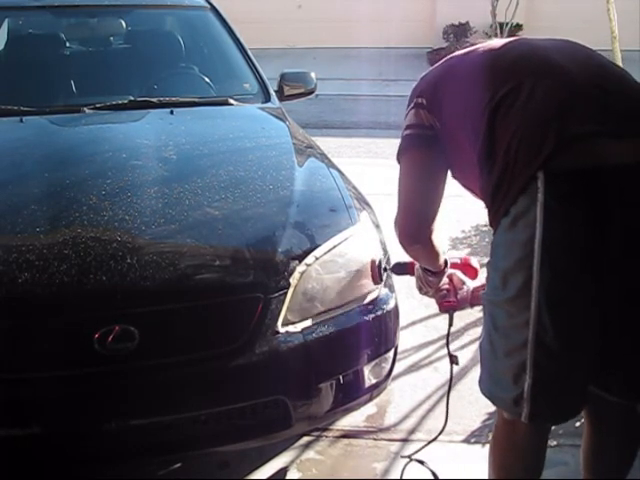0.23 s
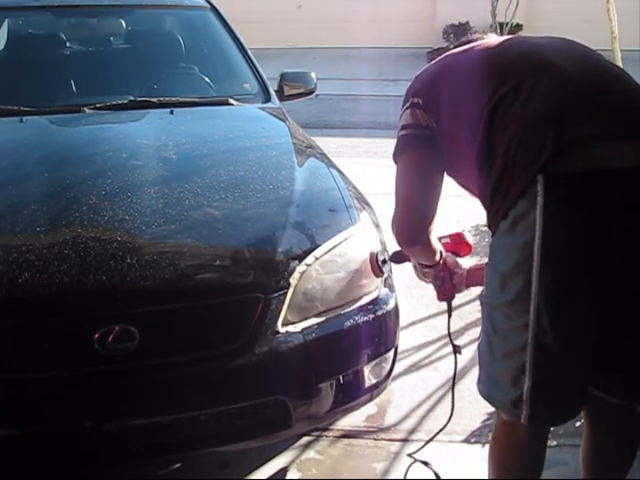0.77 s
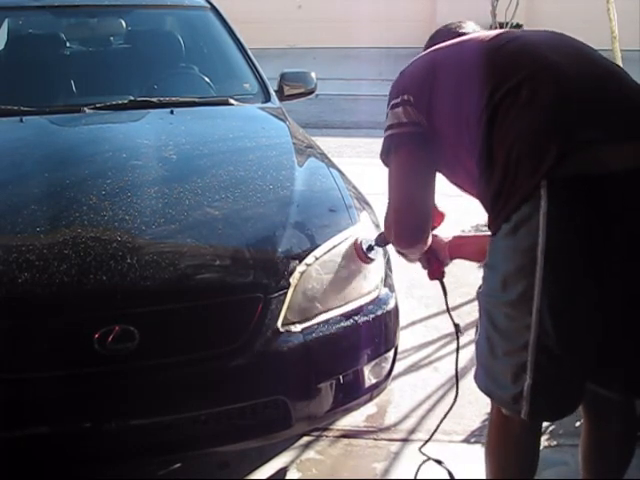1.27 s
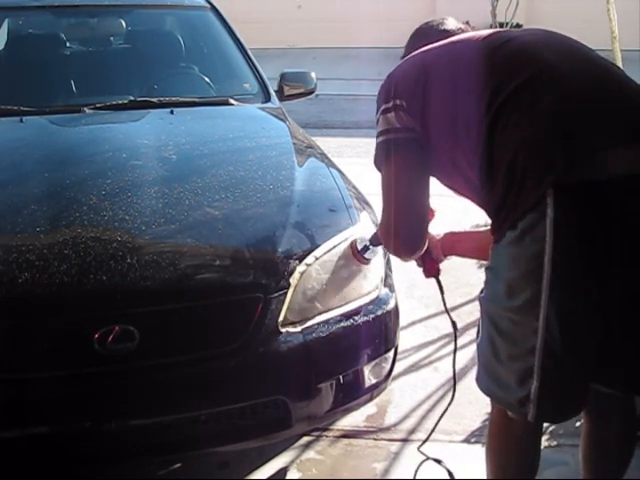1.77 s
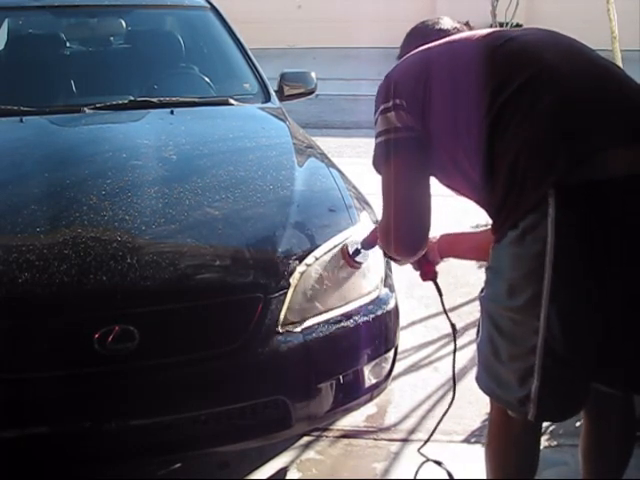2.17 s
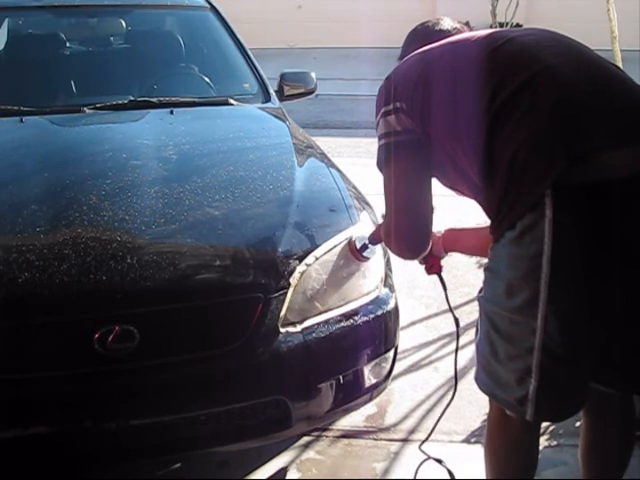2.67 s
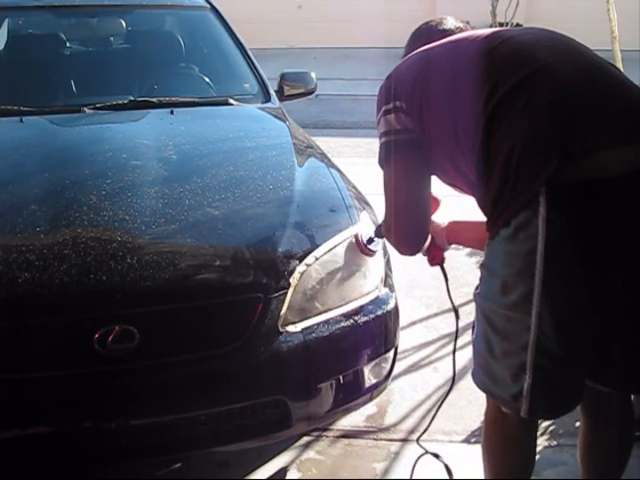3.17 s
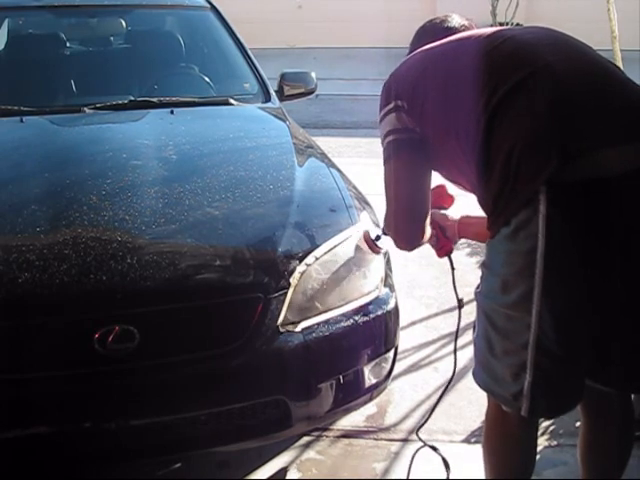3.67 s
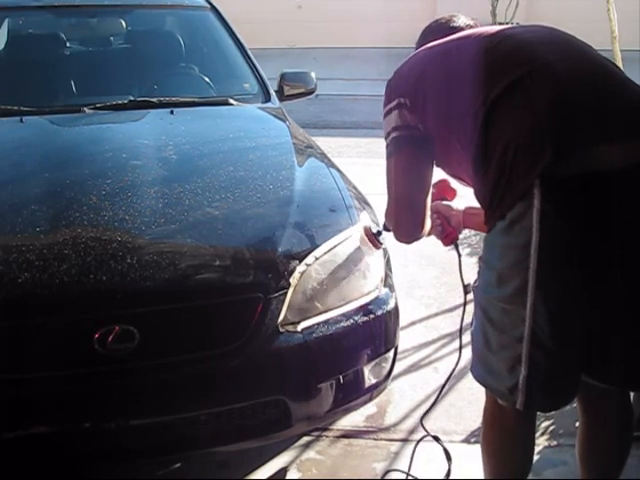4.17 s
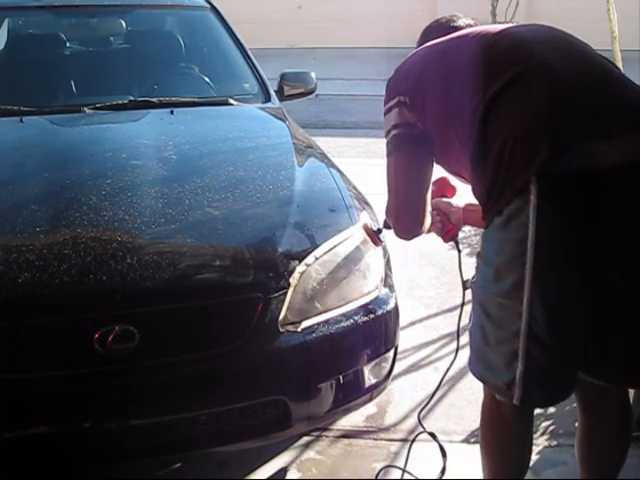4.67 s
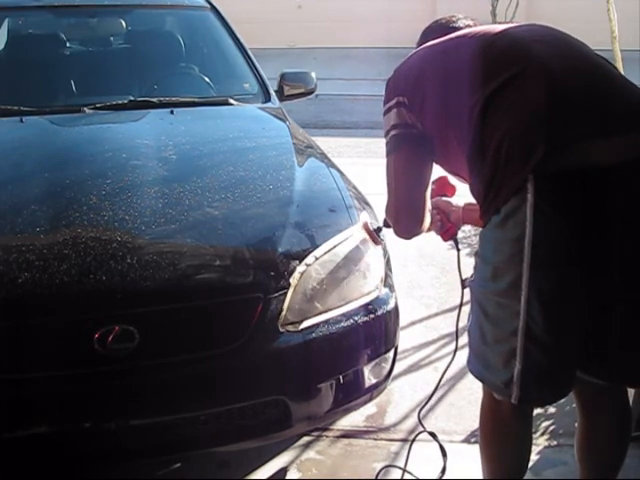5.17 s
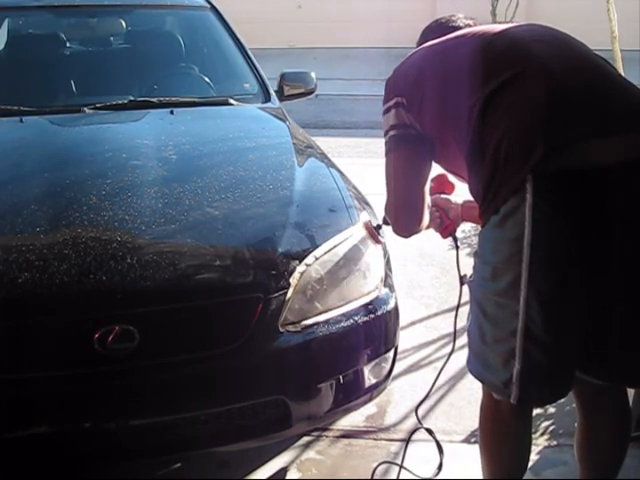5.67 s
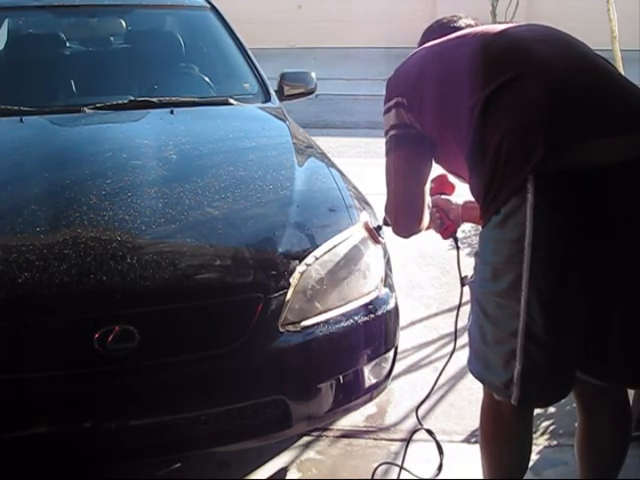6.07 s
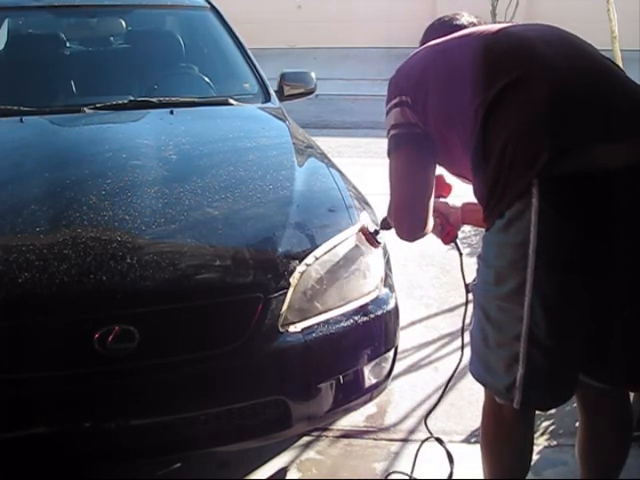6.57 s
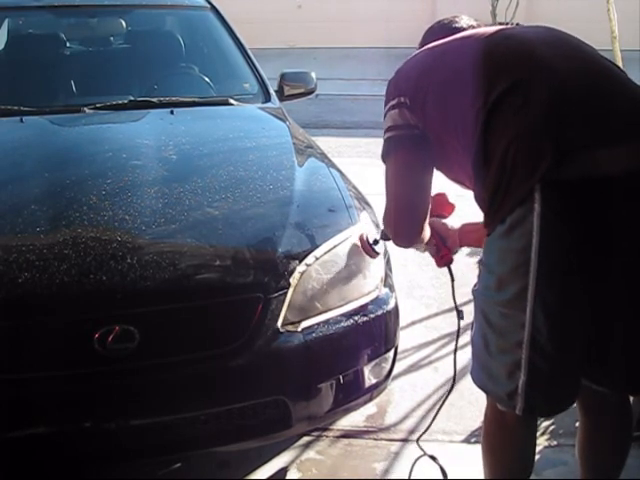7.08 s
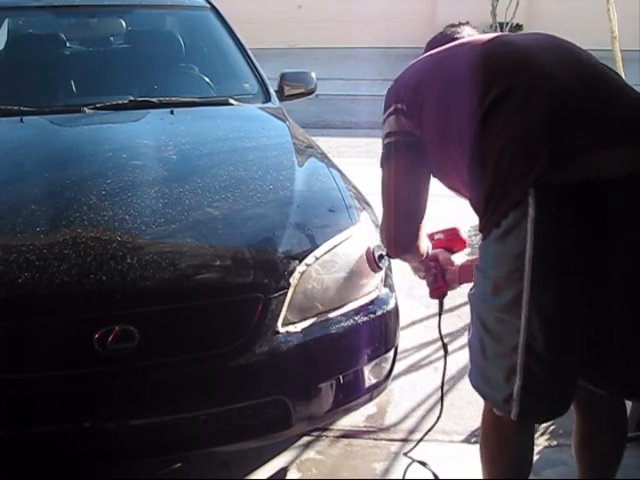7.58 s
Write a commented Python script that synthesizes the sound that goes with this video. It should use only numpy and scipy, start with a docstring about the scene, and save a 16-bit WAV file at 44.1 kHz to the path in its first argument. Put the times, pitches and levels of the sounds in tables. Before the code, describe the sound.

In a driveway, stereo microphones a few metres off pick up a power drill polishing a car headlight. Bright whining tones and rushing motor air dominate, with gritty gear chatter and steady pad sizzle. The motor slows slightly under pressure, frees up midway, bogs down again, then speeds up. Only a very faint low rumble lies behind.

```python
"""Outdoors, a few metres from the microphones, a corded drill spins a foam pad on a car's plastic headlight.
It starts near 245 turns a second, sagging under pressure, while the pad hisses and soon squeals briefly.
Eased off, it rises to 259 after four seconds; later a bearing sings under side load as the speed sags.
Near the end the main whine throbs, then settles as the motor climbs to 263. Gears, shaft and fan whine on
multiples of its speed as tones, mains pulses buzz the gearbox, shaped noise is the hiss and faint low rumble."""
import sys
import numpy as np
from scipy import signal
from scipy.fft import rfft, irfft, next_fast_len
from scipy.io import wavfile
from scipy.ndimage import uniform_filter1d, map_coordinates

SR = 44100
rng = np.random.default_rng(int(sys.argv[2]) if len(sys.argv) > 2 else 0)


def dump(signal):
    """Clip the signal to [-1, 1] and save it as 16-bit WAV at the path in sys.argv[1]."""
    limited = np.clip(np.atleast_2d(signal).T, -1, 1)
    pcm = np.round(limited * 32767).astype(np.int16)
    wavfile.write(sys.argv[1], SR, pcm)


N = 345303  # samples
MAINS_HZ = 60
CRUISE_HZ = 250  # motor turns a second at which the speed laws add nothing
TEETH = 4  # on the pinion
GEARING = 19  # motor turns per spindle turn


def amp(db):
    """Decibels to gain."""
    return 10 ** (np.asarray(db) / 20)


def unit(x):
    """Scaled to rms 1."""
    return x / np.sqrt(np.mean(np.abs(x) ** 2) + 1e-20)


def seconds():
    """The time of every sample."""
    return np.arange(N) / SR


def along(points, x):
    """Value at x between (x, value) points, on a log axis."""
    knots, values = np.transpose(points)
    return np.interp(np.log(x + 1), np.log(knots + 1), values)


def curve(rows):
    """One value per sample, on straight lines between (second, value) rows."""
    times, values = np.transpose(rows)
    return np.interp(seconds(), times, values)


def wobble(rate):
    """A smooth random curve, rate knots a second."""
    knots = rng.standard_normal(4096)
    coarse = np.arange(0, N + 32, 32)
    smooth = map_coordinates(knots, [coarse * rate / SR], mode="wrap")
    return np.interp(np.arange(N), coarse, smooth)


def filtered(x, response):
    """x with its spectrum multiplied by a response of frequency."""
    size = next_fast_len(N + SR // 4)
    hz = np.fft.rfftfreq(size, 1 / SR)
    return irfft(rfft(x, size) * response(hz), size)[..., :N]


def bell(hz, centre, width, db):
    """Lift in dB of one resonance."""
    return db / (1 + (2 * (hz - centre) / width) ** 2)


# How alike noise is at the left and right microphones. Each row: frequency in Hz, likeness from 0 to 1.
LIKENESS = [(250, .995), (480, .98), (700, .93), (1300, .72), (1800, .52), (2500, .33), (3500, .3),
            (5000, .64), (7000, .6), (15000, .71)]


def rush(spectrum, patchy_db):
    """Stereo noise of rms 1, coloured by a spectrum, with patches of random gain in time and frequency."""
    spectra = signal.stft(rng.standard_normal((2, N)), nperseg=512)[2]
    patches = rng.standard_normal(spectra.shape[1:])
    patches = uniform_filter1d(patches, size=4, axis=0)  # across frequency
    patches = uniform_filter1d(patches, size=36, axis=1)  # across time
    pair = signal.istft(spectra * amp(patchy_db * unit(patches)), nperseg=512)[1][:, :N]

    def mid_side_gain(hz):
        fade_below = np.minimum(hz / spectrum[0][0], 1) ** 2
        colour = amp(along(spectrum, hz)) * fade_below
        turn = np.arccos(np.clip(along(LIKENESS, hz), -1, 1)) / 2
        return colour * [np.cos(turn), np.sin(turn)]

    mid, side = filtered(pair, mid_side_gain)
    return unit(np.array([mid + side, mid - side]))


def tone(angle, flutter_db, rough, spread):
    """A machine line of rms 1; reflections shift its level and phase between the two microphones."""
    size = amp(flutter_db * (wobble(2.976) + 1.14 * wobble(22)))
    angle = angle + rough * (wobble(25) + .5 * wobble(160))  # radians
    apart = spread * np.array([[1], [-1]])
    balance = 1 + .4 * apart * wobble(2.5)
    return unit(size * balance * np.sin(angle + apart * (wobble(2) - .6)))


def mains_pulse(sharpness, peak):
    """Torque comes in one surge per mains cycle; peak is its place in the cycle, 0-1."""
    cycle = seconds() * MAINS_HZ - peak
    return np.exp(sharpness * (np.cos(2 * np.pi * cycle) - 1))


# Colour of the faint low rumble. Each row: frequency in Hz, relative density in dB per Hz.
GROUND_SPECTRUM = [(15, -24), (40, -10), (70, 0), (100, -11), (200, -35)]
# When the rumble is at its upper level. Each row: start in seconds, end in seconds, each mid-fade.
RUMBLE_TIMES = [(.9, 2.4), (4.3, 6.15), (6.55, 7.6)]
# Swell of the distant hum. Each row: time in seconds, level in dB.
HUM_LEVEL = [(2.7, -78), (3.6, -73.5)]
UPPER_DB, LOWER_DB, RUMBLE_FADE_S = -76, -96, .2  # rumble levels before the random unevenness
HUM_HZ = 132


def outdoors():
    """Background: faint low rumble of noise with random unevenness, and a distant low tone that swells."""
    t = seconds()
    raised = sum(np.clip(.5 + np.minimum(t - start, end - t) / RUMBLE_FADE_S, 0, 1)
                 for start, end in RUMBLE_TIMES)
    rumble_db = LOWER_DB + (UPPER_DB - LOWER_DB) * raised + 5.5 * wobble(9)
    rumble = amp(rumble_db) * rush(GROUND_SPECTRUM, patchy_db=1.5)
    hum = tone(2 * np.pi * HUM_HZ * t, flutter_db=1.8, rough=0.5, spread=.03)
    return rumble + amp(curve(HUM_LEVEL)) * hum


# Short echoes off the fender, the paving and the bonnet. Each row: mean delay in seconds, level in dB.
ECHOES = [(.002, -25.5), (.0035, -22), (.0051, -18), (.006, -15), (.0091, -18.5)]


def bounced(x, sway=0.00015):
    """Nearby surfaces comb the hiss; delays drift on the scale of sway, in seconds, as the drill moves."""
    now = np.arange(N)
    wet = x.copy()
    for delay, db in ECHOES:
        then = now - (delay + sway * wobble(0.798)) * SR
        wet += amp(db) * np.array([np.interp(then, now, side, left=0) for side in x])
    return wet


# Colours of the vent air, foam pad, pad sizzle and carbon brushes.
# Each row: frequency in Hz, relative density in dB per Hz.
AIR_SPECTRUM = [(30, -80), (80, -60), (115, -38), (160, -32), (205, -35.5), (300, -24), (480, -15),
                (750, -13), (1050, -5.5), (1400, -3), (1900, 3.5), (2400, 0), (3000, 1), (4000, -41),
                (7000, -51)]
PAD_SPECTRUM = [(1200, -42), (2300, -3.5), (2900, 3), (3250, 1.5), (3600, 4), (4100, 3), (4600, -6.5),
                (5400, -42), (7000, -50)]
SIZZLE_SPECTRUM = [(3000, -37), (4100, -5), (4650, 1.5), (5200, 0), (5900, -7.5), (6800, -14.5),
                   (9000, -40)]
BRUSH_SPECTRUM = [(3000, -44), (5500, 2), (6800, -1.5), (8300, 2), (9500, 0.5), (11000, -5), (13000, -9.5),
                  (15000, -11.5), (15900, -28)]
# How each hiss follows the work. Each holds: base level in dB at cruising speed, before pulsing and echoes,
# dB per dB of rub, dB per extra motor turn a second.
AIR_RESPONSE = (-26, .3, 0.042)
PAD_RESPONSE = (-22.5, 0.4, 0.056)
SIZZLE_RESPONSE = (-26.5, .4, 0.021)
BRUSH_RESPONSE = (-30.5, 1.0, 0.022)
# How firmly the pad rubs as the hand moves it about. Each row: time in seconds, rub in dB.
RUB_FIRMNESS = [(0.0, -0.5), (0.3, 1.5), (0.78, -1.2), (1.38, 1.6), (1.53, -1.4), (2.1, 0.5), (2.43, -2.5),
                (2.85, 0), (3.45, -2.6), (3.72, 0.1), (4.68, -0.5), (4.92, 2.5), (5.07, 0.8), (5.25, 1.9),
                (5.37, 0), (7.08, -0.2), (7.26, 1.1), (7.83, -1.2)]
# Side load on the spindle, also heard in bearing and gears. Each row: time in seconds, load in dB.
SPINDLE_LOAD = [(0, -8), (4.6, -6), (5.1, 3), (5.6, 8.5), (6.15, 2), (6.5, 6.5), (6.95, -6), (7.83, -4)]
SIZZLE_PER_LOAD = -0.16  # dB per dB of side load: the tilted pad sizzles less


def rubbing(shaft, speed):
    """Noise of vent air, the wet pad rubbing once around per spindle turn, and the carbon brushes."""
    rub_db = curve(RUB_FIRMNESS)

    def hiss_db(response):
        db, per_rub, per_turn = response
        return db + per_rub * rub_db + per_turn * (speed - CRUISE_HZ)

    sizzle_db = hiss_db(SIZZLE_RESPONSE) + SIZZLE_PER_LOAD * curve(SPINDLE_LOAD)
    spindle = shaft / GEARING + .3 * wobble(3)
    # the pad is a little lopsided and grips unevenly
    swish = np.sin(spindle) + 0.52 * np.sin(2 * spindle)
    swish += wobble(30) + 1.2 * wobble(9)
    chop = np.sin(shaft + 1.8 * wobble(28))  # every motor turn pulses the pad and brush noise

    air = amp(hiss_db(AIR_RESPONSE) + 0.29 * wobble(14)) * rush(AIR_SPECTRUM, patchy_db=0.4)
    foam = amp(hiss_db(PAD_RESPONSE)) * rush(PAD_SPECTRUM, patchy_db=0.7)
    foam += amp(sizzle_db) * rush(SIZZLE_SPECTRUM, patchy_db=0.7)
    pad = amp(.5 * swish + .45 * chop) * foam
    brush_db = hiss_db(BRUSH_RESPONSE) + 0.46 * swish + .5 * chop
    brush = amp(brush_db) * rush(BRUSH_SPECTRUM, patchy_db=1.94)
    # left and right gains place each source
    return air * amp([[-.6], [.6]]) + pad * amp([[-1.0], [.9]]) + brush


# The pad catches and squeals. Each row: middle in seconds, half length in seconds (where it is down to 1/e),
# multiple of motor speed, level in dB at the middle.
SQUEAL_EVENTS = [(.87, .14, 19, -30), (1.37, .17, 21, -27.5), (1.5, .35, 17, -33), (3.6, .22, 19, -33)]


def squeals(shaft):
    """Brief rough squeals of the pad on the lens, locked to the motor's vibration."""
    t = seconds()
    total = 0
    for middle, half, multiple, db in SQUEAL_EVENTS:
        swell = np.exp(-((t - middle) / half) ** 2)
        total = total + amp(db) * swell * tone(multiple * shaft, flutter_db=2.5, rough=.55, spread=.3)
    return total


# Shell resonances that lift the lines gliding through them. Each row: centre in Hz, width in Hz, lift in dB.
SHELL_RESONANCES = [(4130, 80, 5), (5120, 90, 5)]


def housing(hz):
    """Gain of the drill's plastic shell at each frequency."""
    return amp(sum(bell(hz, *resonance) for resonance in SHELL_RESONANCES))


# Imbalance hum grows with speed. Each row: motor turns a second, level in dB.
IMBALANCE = [(241, -69), (246, -57.5), (258, -55.5), (263, -50.5)]
# Weaker shaft lines. Each row: multiple of motor speed, level in dB at cruising speed before the shell.
SHAFT_LINES = [(2, -54), (3, -57), (6, -48), (7, -42), (9, -38), (11, -41), (13, -38), (15, -40), (17, -40),
               (18, -44), (19, -37), (20, -41), (21, -42), (22, -47), (24, -49)]
# Ball-bearing lines. Each row: multiple of motor speed, level in dB before the side load.
BEARING_LINES = [(2.285, -52), (2.56, -61), (4.57, -54), (9.13, -45), (10.28, -43), (10.56, -45)]
# Commutator whistle. Each row: multiple of motor speed, level in dB before a 1 dB lift.
COMMUTATOR_LINES = [(32, -48), (40, -43), (48, -59)]
LINES_DB_PER_TURN = 0.23  # shaft lines grow by this for each extra turn a second


def motor(shaft, speed):
    """Tones on multiples of shaft speed: imbalance hum, shaft lines, singing bearing, commutator whistle."""
    hum = amp(along(IMBALANCE, speed)) * tone(shaft, flutter_db=1.2, rough=.12, spread=0.03)
    lines = sum(amp(db) * tone(k * shaft, flutter_db=1.8, rough=.27, spread=min(.04 * k, .3))
                for k, db in SHAFT_LINES)
    lines *= amp(LINES_DB_PER_TURN * (speed - CRUISE_HZ))
    bearing = sum(amp(db) * tone(k * shaft, flutter_db=-0.6, rough=0.55, spread=0.046)
                  for k, db in BEARING_LINES)
    bearing = amp(curve(SPINDLE_LOAD)) * bearing
    lurch = 0.019 * np.sin(2 * np.pi * MAINS_HZ * seconds())  # radians: the rotor hurries with each surge
    whistle = sum(amp(db + 1) * tone(k * (shaft + lurch), flutter_db=.5, rough=.8, spread=.2)
                  for k, db in COMMUTATOR_LINES)
    whistle *= unit(.5 + mains_pulse(sharpness=1.2, peak=.17))
    return hum + whistle + (filtered(lines, housing) + bearing) * amp([[-.8], [.8]])


THROB_START_S, THROB_HZ, THROB_DB, THROB_SETTLE_S = 6.374, 4.3, 3.5, 1.2


def throb():
    """Slow beating of the main whine, in dB, that settles as the motor speeds up."""
    age = seconds() - THROB_START_S
    onset = np.clip(2 * THROB_HZ * age, 0, 1)
    depth = THROB_DB * onset * np.exp(-np.abs(age) / THROB_SETTLE_S)
    return -depth * np.cos(2 * np.pi * THROB_HZ * age)


# The mesh fundamental. Each row: time in seconds, level in dB.
FIRST_LEVEL = [(0.0, -38.2), (0.24, -48.1), (0.93, -38.1), (2.13, -41.2), (2.34, -48.8), (2.94, -38.5),
               (5.79, -36.9), (5.97, -46.9), (6.72, -42.8), (6.93, -36.9), (7.41, -38.7), (7.83, -49.1)]
# The main whine, the second mesh partial. Each row: time in seconds, level in dB before a 0.8 dB lift,
# throb and flutter.
SECOND_LEVEL = [(0, -37.3), (0.68, -33.8), (0.85, -29.6), (1.2, -25.2), (1.5, -28.1), (1.68, -33.2),
                (2.15, -31.2), (2.78, -35.4), (3.3, -28.5), (3.92, -39.2), (4.14, -28.6), (4.74, -34.8),
                (5.13, -22.2), (5.4, -32.4), (5.57, -25.5), (5.98, -27.6), (6.2, -36.8), (6.55, -29.2),
                (7.83, -29.0)]
# The third mesh partial. Each row: time in seconds, level in dB.
THIRD_LEVEL = [(0, -37), (.25, -30), (.62, -30), (.8, -39), (1.5, -30), (3.4, -39), (3.85, -29.5),
               (4.6, -40), (5.7, -32), (6.25, -45), (6.8, -33), (7.83, -40)]
# Teeth chatter under load and calm when the motor runs free. Each row: time in seconds, level in dB.
CHATTER_LEVEL = [(0, -35), (1.0, -31.5), (1.45, -25), (3.2, -25), (4.2, -35.5), (5.6, -32.5), (7.83, -33)]
RATTLE_DB, RATTLE_PER_LOAD = -31.5, 0.6  # fourth partial off resonance at 0 dB load; dB per dB of side load
CASE_HZ, CASE_WIDTH_HZ, CASE_DB = 4038, 73, 5  # gear case resonance that lifts the rattle


def gears(shaft, speed):
    """The pinion's mesh tone and overtones; torque surges slap the teeth and ring the gear case."""
    mesh = TEETH * shaft + 0.072 * np.sin(shaft / GEARING)  # the big wheel runs slightly off centre
    first, second, third, fourth = np.arange(1, 5)[:, None] * mesh

    second_db = curve(SECOND_LEVEL) + .8 + throb() + 1.5 * wobble(45)
    whine = amp(curve(FIRST_LEVEL)) * tone(first, flutter_db=0.7, rough=0.28, spread=0.11)
    whine += amp(second_db) * tone(second, flutter_db=.5, rough=.2, spread=.35)
    whine += amp(curve(THIRD_LEVEL)) * tone(third, flutter_db=2, rough=0.28, spread=0.33)

    # each surge winds up the gear train, so the slap rings a little below the third partial
    windup = 1.6 * np.sin(2 * np.pi * (seconds() * MAINS_HZ - .11))
    slap_size = mains_pulse(sharpness=2.2, peak=.11) * amp(2.2 * wobble(60))
    slaps = slap_size * tone(third - windup, flutter_db=.3, rough=.4, spread=.45)
    buzz = amp(curve(CHATTER_LEVEL)) * unit(slaps) * amp([[-.6], [.6]])

    # the fourth partial stutters as the teeth rattle in their play
    rattle_db = RATTLE_DB + RATTLE_PER_LOAD * curve(SPINDLE_LOAD)
    rattle_db += bell(4 * TEETH * speed, CASE_HZ, CASE_WIDTH_HZ, CASE_DB)
    stutter = (.7 + mains_pulse(sharpness=1.1, peak=.5)) * amp(3 * wobble(80))
    buzz += amp(rattle_db) * unit(stutter * tone(fourth, flutter_db=.2, rough=.5, spread=.25))
    return (whine + buzz) * amp([[-1.2], [1.1]])


# Motor speed, sagging under pressure, rising when eased off.
# Each row: time in seconds, motor turns a second before a slight random wobble.
MOTOR_SPEED = [(0.0, 245.42), (0.51, 241.59), (0.66, 241.77), (0.87, 246.05), (1.14, 246.59),
               (1.53, 242.46), (1.98, 245.19), (2.49, 245.42), (3.18, 249.26), (3.48, 249.98),
               (3.72, 254.94), (4.23, 258.97), (4.56, 257.33), (6.15, 244.24), (6.6, 243.75),
               (6.75, 245.29), (7.65, 261.18), (7.83, 262.85)]


def scene():
    """Everything in the drill follows the speed and angle of the motor shaft."""
    speed = curve(MOTOR_SPEED) + 0.1226 * wobble(12)
    shaft = 2 * np.pi * np.cumsum(speed) / SR  # radians
    hiss = amp(-0.28) * bounced(rubbing(shaft, speed))
    return outdoors() + hiss + squeals(shaft) + motor(shaft, speed) + gears(shaft, speed)


TOP_HZ = 15750


def record(dry):
    """The microphones' signal keeps nothing from the band limit upwards."""
    return filtered(dry, lambda hz: hz < TOP_HZ)


dry = scene()
out = record(dry)
dump(out)
```